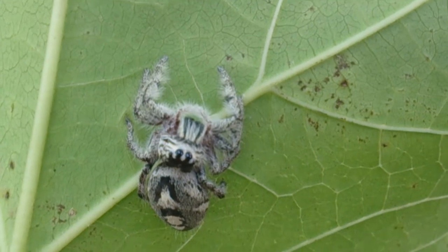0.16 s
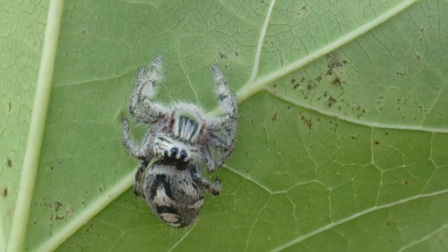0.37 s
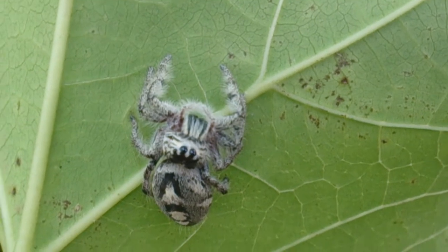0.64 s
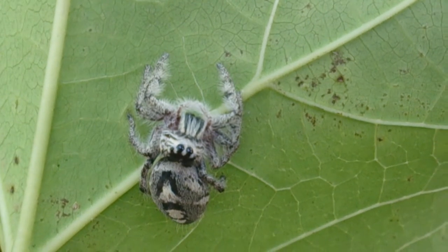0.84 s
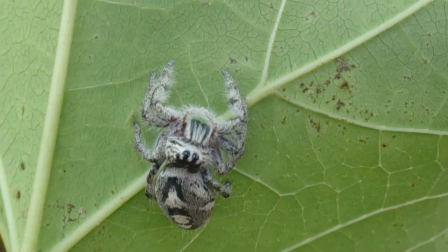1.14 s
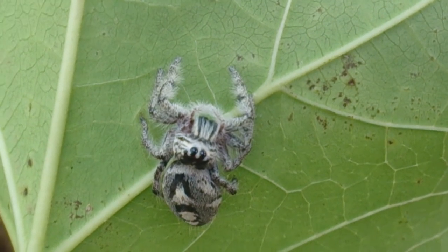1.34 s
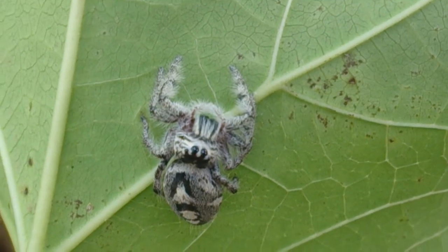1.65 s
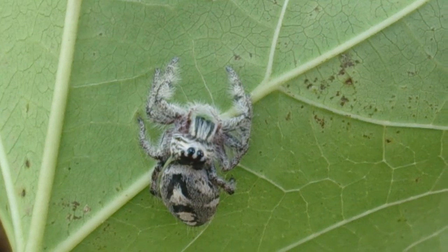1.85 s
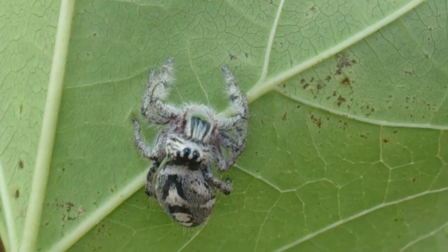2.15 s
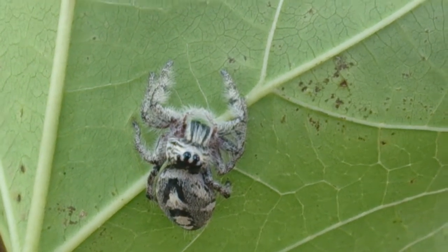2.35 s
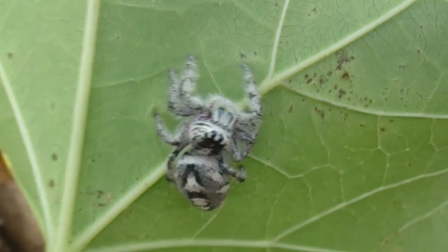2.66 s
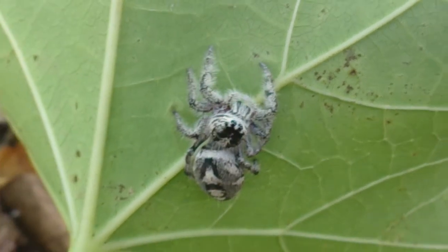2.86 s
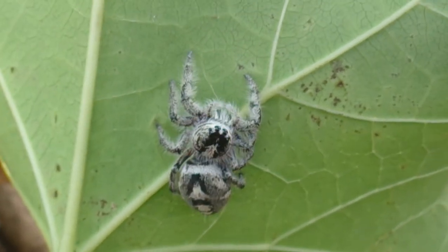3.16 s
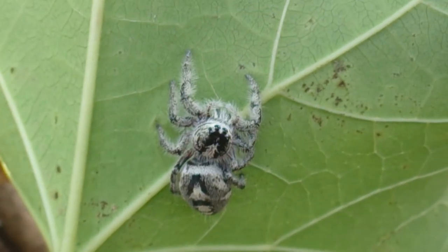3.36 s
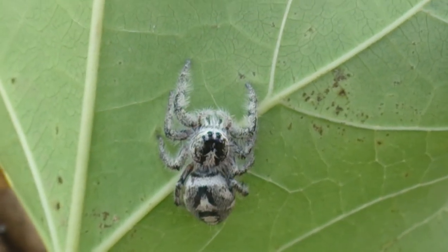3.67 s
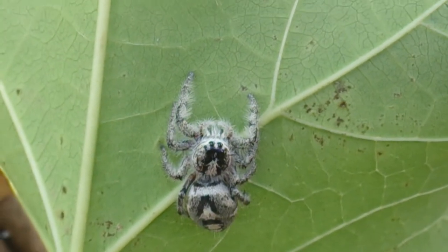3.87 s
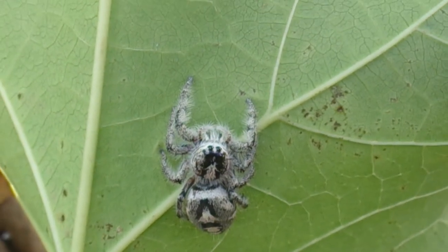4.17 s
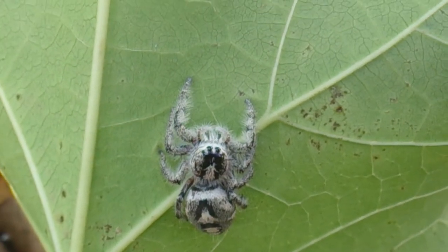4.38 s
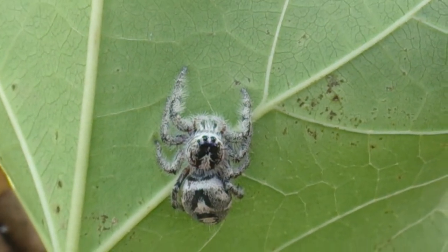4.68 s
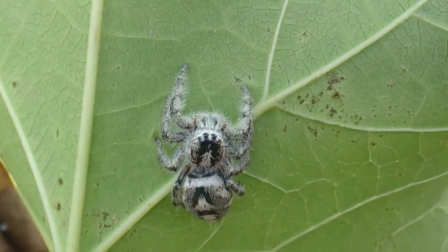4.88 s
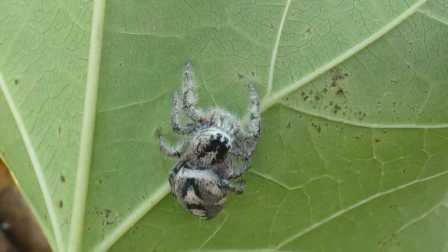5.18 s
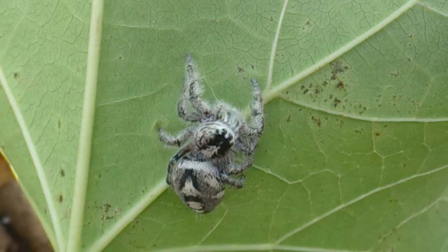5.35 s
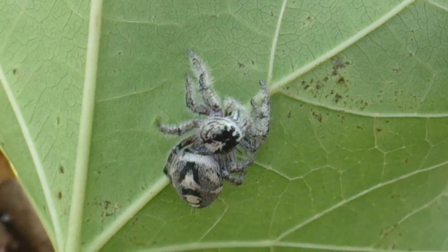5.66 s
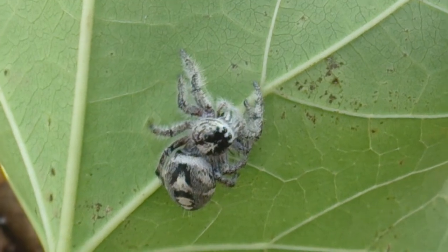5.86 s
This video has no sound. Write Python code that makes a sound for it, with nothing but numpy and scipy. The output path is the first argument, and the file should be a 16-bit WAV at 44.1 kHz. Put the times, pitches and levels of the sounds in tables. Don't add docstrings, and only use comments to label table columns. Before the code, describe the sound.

Breezy garden close-up: soft bassy gusts thump the microphone, a high cricket trills steadily, small ticks recur, and a near bird gives two short falling chirps.

```python
import sys
import numpy as np
from scipy import signal
from scipy.fft import rfft, irfft, next_fast_len
from scipy.io import wavfile
from scipy.ndimage import uniform_filter1d, map_coordinates

SR = 44100
rng = np.random.default_rng(int(sys.argv[2]) if len(sys.argv) > 2 else 0)


def gain_from_db(level_db):
    decades = np.asarray(level_db, float) / 20
    return 10 ** decades


def waveform_to_disk(signal):
    frames = np.transpose(np.atleast_2d(signal))
    scaled = np.clip(frames, -1, 1) * 32767
    samples = np.round(scaled).astype(np.int16)
    wavfile.write(sys.argv[1], SR, samples)


N = 265482


def unit(x):
    return x / np.sqrt(np.mean(x ** 2) + 1e-20)


def along(points, hz):
    f, v = np.transpose(points)
    return np.interp(np.log(hz + 1), np.log(f + 1), v)


def curve(rows):
    return np.interp(np.arange(N) / SR, *np.transpose(rows))


def wobble(rate):
    knots = rng.standard_normal(int(N * rate / SR) + 4)
    return map_coordinates(knots, [np.arange(N) * rate / SR])


def filtered(x, response):
    m = next_fast_len(N + SR // 2)
    return irfft(rfft(x, m) * response(np.fft.rfftfreq(m, 1 / SR)), m)[..., :N]


def resonances(peaks):
    def response(f):
        total = 0
        for k, (centre, width, db) in enumerate(peaks):
            damping = 1j * f * width
            total = total + (-1) ** k * gain_from_db(db) * damping / (centre * centre - f * f + damping)
        return total
    return response


def add(track, s, sound):
    part = track[round(s * SR):][:len(sound)]
    part += sound[:len(part)]


def notes(table, bend, skew, overtone_db, size, pointed=.46):
    out = np.zeros(N)
    for s, length, first_hz, last_hz, db, rough in table:
        u = np.arange(round(length * SR)) / (length * SR)
        phase = 2 * np.pi * np.cumsum(first_hz + (last_hz - first_hz) * u ** bend) / SR
        flutter = rng.standard_normal((2, SR // 4))
        flutter = uniform_filter1d(uniform_filter1d(flutter, size=size), size=size)
        flutter = unit(flutter)[:, :len(u)]
        unsteady = 1 - rough + rough * (flutter[0] + 1j * flutter[1]) / np.sqrt(2)
        voice = unsteady * np.exp(1j * phase)
        swell = np.sin(np.pi * u ** skew) ** pointed
        add(out, s, gain_from_db(db) * swell * (voice.real + gain_from_db(overtone_db) * (voice ** 2).real))
    return out


def foliage(x, t60, wet_db):
    t = np.arange(SR // 4) / SR
    tail = rng.standard_normal((2, len(t))) * gain_from_db(-60 * t / t60) * (t > .004)
    tail = tail / np.linalg.norm(tail[0])
    return gain_from_db(wet_db) * signal.fftconvolve(x[None], tail, axes=1)[:, :N]


def patchy(patchy_db):
    z = signal.stft(rng.standard_normal(N), nperseg=512)[2]
    field = uniform_filter1d(rng.standard_normal(z.shape), size=6, axis=0)
    field = uniform_filter1d(field, size=12, axis=1)
    return unit(signal.istft(z * gain_from_db(patchy_db * unit(field)), nperseg=512)[1][:N])


# (frequency [Hz], density [dB per Hz])
HISS_LEFT = [(100, -87), (200, -91.5), (400, -98), (800, -102.4), (1600, -104.8), (3000, -107.2),
             (6200, -110.8), (7000, -109.9), (7800, -107.7), (10600, -107.4), (11600, -103.2),
             (13000, -103.9), (15000, -106.8)]
HISS_RIGHT = [(200, -90.5), (400, -95.5), (800, -100.5), (1400, -100.4), (2300, -96), (3000, -98.5),
              (3700, -101.1), (5000, -101.1), (6200, -96), (7000, -96.5), (8300, -103.9), (11000, -106.6),
              (15000, -110.6)]
# (frequency [Hz], share [0-1])
COHERENCE = [(150, 0.32), (280, 0.58), (700, 0), (1500, 0), (2500, 0.2), (9000, 0.01)]


def hiss():
    frame_hz, port_lag = 29.97, 15
    share = lambda hz: np.clip(along(COHERENCE, hz), 0, 1)
    common = patchy(patchy_db=0.5)
    own = np.array([patchy(patchy_db=1.0), patchy(patchy_db=1.8)])
    shared = np.array([np.roll(common, port_lag), common])
    white = filtered(own, lambda hz: np.sqrt(1 - share(hz)))
    white = white + filtered(shared, lambda hz: np.sqrt(share(hz)))
    colour = lambda hz: gain_from_db([along([(40, -120)] + port, hz) for port in (HISS_LEFT, HISS_RIGHT)])
    left, right = np.sqrt(SR / 2) * filtered(white, colour)

    treble = filtered(left, lambda hz: hz ** 6 / (hz ** 6 + 8000. ** 6))
    turn = 2 * np.pi * frame_hz * np.arange(N) / SR
    throb_db = 1.67 * np.cos(turn + 1.1) + 1.62 * np.cos(2 * turn + 1.7)
    throb_db = throb_db + 0.65 * wobble(3.597) + 0.63 * wobble(60)
    return np.array([left + treble * (gain_from_db(throb_db + 1.0) - 1), right])


# (centre [s], pitch [Hz], peak [dB], side [0 left, 1 right])
SLAPS = [(2.199, 247, -40, 0), (2.209, 127, -34, 0), (2.474, 109, -35.5, 0), (2.592, 102, -36, 0),
         (3.469, 158, -41, 0), (2.741, 308, -51, 0), (4.958, 120.7, -43, 0), (1.68, 64, -30.5, 1),
         (1.934, 55.2, -21, 1), (2.478, 36.1, -21.5, 1), (2.935, 37.1, -21.5, 1), (3.498, 48.2, -21, 1),
         (5.071, 47.2, -21, 1), (5.251, 32.6, -22.5, 1), (5.476, 30.1, -21.5, 1), (0.157, 45.2, -32.5, 1),
         (1.954, 98.3, -41, 1), (5.076, 124.2, -45.5, 1), (2.533, 112.4, -36.5, 1), (2.841, 56.3, -27, 1),
         (3.086, 106.3, -32.5, 1), (3.283, 85.5, -33.5, 1), (5.201, 59, -32, 1), (5.406, 89.8, -33.5, 1),
         (1.57, 30, -45, 0), (1.781, 35, -41.5, 0), (2.11, 40, -44, 0), (2.33, 149, -44, 0),
         (3.552, 45, -36, 0), (5.52, 25, -42, 0)]
# (centre [s], pitch [Hz], peak [dB])
PATS_LEFT = [(0.314, 73, -52.5), (0.492, 87, -50.5), (0.892, 65, -50), (1.345, 86.3, -48.5),
             (1.487, 72.5, -49.5), (1.769, 73, -50), (1.833, 81, -47), (2.139, 66, -38.5),
             (2.871, 66, -52.5), (3.213, 70.3, -40.5), (3.562, 64, -45.5), (3.812, 61, -47),
             (4.335, 73, -47.5), (4.904, 64, -41), (5.371, 63, -45.5), (5.697, 75, -53)]
PATS_RIGHT = [(0.411, 78.5, -44), (0.467, 64, -40.5), (0.62, 49, -47), (0.729, 72, -49), (0.79, 56, -53.5),
              (0.892, 53, -46), (1.07, 64, -49.5), (1.182, 60, -44), (1.232, 64, -45), (1.461, 55.5, -40.5),
              (1.571, 54, -39), (1.859, 43.5, -34), (2.003, 53.7, -27.5), (2.083, 51.7, -26),
              (2.171, 52, -28), (2.36, 55, -39.5), (2.584, 63, -36), (2.636, 51.5, -28), (2.761, 45.4, -30),
              (3.158, 54.7, -33), (3.222, 62, -38.5), (3.384, 81.5, -39), (3.625, 51.7, -34),
              (3.685, 51.2, -34), (3.791, 53, -45), (3.882, 48, -42), (3.978, 47.8, -39.5),
              (4.06, 51, -48.5), (4.118, 45, -42), (4.2, 51, -54), (4.26, 55, -42), (4.338, 66, -55.5),
              (4.409, 60, -50.5), (4.527, 59, -44), (4.607, 76.4, -45), (4.893, 49, -44),
              (5.005, 53, -34.5), (5.556, 55, -35.5), (5.657, 47, -49.5), (5.714, 45, -37)]


def slaps():
    pat_db = -1
    edge_db, edge_ratio, edge_lead = -16, 1.9, .2
    out = np.zeros((2, N))
    t = np.arange(-SR // 10, SR // 10) / SR
    pats = [(s, hz, db + pat_db, side)
            for side, table in enumerate((PATS_LEFT, PATS_RIGHT)) for s, hz, db in table]
    for s, hz, db, side in SLAPS + pats:
        port = out[int(side > .5)]
        front = edge_ratio * (hz * t + edge_lead)
        add(port, s - .1, gain_from_db(db + edge_db) * np.exp(-(2 * front) ** 2) * np.sin(2 * np.pi * front))
        body = np.cos(2 * np.pi * hz * t * (1 - 0.191 * hz * t))
        add(port, s - .1, gain_from_db(db) * np.exp(-(1.897 * hz * t) ** 2) * body)
    return out


def stirred(calm_db, side):
    stir_db, stir_s = -18, .035
    time = np.arange(N) / SR
    wakes = sum(gain_from_db(db + stir_db) * np.exp(-((time - s) / stir_s) ** 2)
                for s, hz, db, port in SLAPS if int(port > .5) == side)
    return 20 * np.log10(gain_from_db(calm_db) + wakes)


def eddies(breeze_db, firm_db, grows, calm_db):
    reference_db = -40
    windy_db = firm_db + grows * (breeze_db - reference_db)
    return 10 * np.log10(gain_from_db(2 * windy_db) + gain_from_db(2 * calm_db))


def buffet(colour, gust_db, ripple_db, lumpy_db):
    white = rng.standard_normal(N)
    shape = lambda hz: gain_from_db(along(colour + [(600, -130)], hz)) * (hz > 3)
    air = filtered(white, shape)
    small = filtered(white, lambda hz: shape(hz) * hz ** 4 / (hz ** 4 + 60 ** 4))
    big = unit((air - small) * gain_from_db(lumpy_db * wobble(7.4)))
    bunching = .4 + uniform_filter1d(np.abs(big), size=900)
    small = unit(small * gain_from_db(2.5 * wobble(22)) * bunching)
    return gain_from_db(gust_db) * big + gain_from_db(ripple_db) * small


# (frequency [Hz], density [dB per Hz])
EDDY_LEFT = [(8, -63.5), (20, -58), (30, -60.5), (45, -63.5), (70, -67.5), (100, -77), (150, -78.5),
             (250, -94.5)]
EDDY_RIGHT = [(6, -44), (12, -48), (20, -51.5), (30, -45), (45, -56.5), (70, -59.5), (100, -66.5),
              (150, -73.5), (250, -101)]
# (time [s], strength [dB])
BREEZE = [(0, -61), (.15, -43), (.3, -65), (1.0, -60), (1.5, -62), (1.75, -43), (2.0, -36), (2.35, -41),
          (2.6, -37.5), (3.0, -43), (3.5, -37), (3.8, -52), (4.2, -44), (4.45, -63), (4.9, -45.5),
          (5.1, -40), (5.5, -46), (6.02, -50.5)]
# (time [s], strength [dB])
LEE = [(0, -37.5), (.4, -56), (1.4, -46.5), (2.0, -39.5), (2.5, -29), (2.95, -45), (3.5, -31.5),
       (3.75, -39.5), (4.6, -49), (4.95, -36.5), (6.02, -46.5)]


def wind():
    breeze_db, lee_db = curve(BREEZE), curve(LEE)
    big_left = eddies(lee_db, firm_db=-57.5, grows=0.99, calm_db=-69)
    small_left = eddies(lee_db, firm_db=-68, grows=1.17, calm_db=-65.5)
    big_right = eddies(breeze_db, firm_db=-34, grows=0.868, calm_db=-48)
    small_right = eddies(breeze_db, firm_db=-54, grows=2.35, calm_db=-57.5)
    left = buffet(EDDY_LEFT, big_left, stirred(small_left, 0), lumpy_db=-1.5)
    right = buffet(EDDY_RIGHT, big_right, stirred(small_right, 0.996), lumpy_db=2.0)
    return np.array([left, right]) + slaps()


def cricket():
    start_s, period_s, chirr_db = .034, .1186, -57.5
    lull_s, lull_wide_s, lull_db = 4.1, .3, 1.5
    attack_s = .0018
    out, t = np.zeros(N), np.arange(SR // 50) / SR
    effort = chirr_db - lull_db * np.exp(-((np.arange(N) / SR - lull_s) / lull_wide_s) ** 2)
    for s in np.arange(start_s, N / SR - .04, period_s):
        chance = rng.standard_normal(8) * [2, 2, 2, 2, 2, 2, .8, 1.5]
        for k in range(6):
            hz = 7660 - 60 * k + 40 * chance[k]
            stroke = np.sin(2 * np.pi * hz * t) * (t / attack_s) * np.exp(1 - t / attack_s)
            size_db = effort[round(s * SR)] + chance[6] + chance[5 - k] - 1.6 * abs(k - 1.3)
            when = s + .0062 * k + chance[7] / 1000 + .0005 * chance[k - 3]
            add(out, when, gain_from_db(size_db) * stroke)
    return out


# (start [s], length [s], first pitch [Hz], last pitch [Hz], peak [dB])
HIGH_WHISTLES = [
    (.2, .1, 6900, 7450, -59),
    (.41, .06, 6700, 7250, -58),
    (.655, .09, 6700, 7200, -58),
    (.93, .05, 6500, 7000, -58),
    (.96, .15, 6950, 7350, -56),
    (3.215, .13, 6650, 7150, -57),
    (4.85, .05, 6950, 7100, -58),
    (5.07, .14, 6100, 7350, -59),
    (5.29, .06, 6950, 7000, -58),
    (5.77, .11, 6500, 7150, -59),
]
# (start [s], length [s], first pitch [Hz], peak [dB])
LOW_WHISTLES = [
    (1.115, .1, 3800, -62.5),
    (1.65, .06, 4400, -69),
    (2.0, .1, 4100, -68),
    (3.665, .065, 4150, -62.5),
    (4.84, .07, 4100, -67),
    (5.955, .08, 3870, -57.5),
]


def far_birds():
    rise_hz_per_s, high_rough, low_rough = 9500, .55, .35
    high = [(s, length, first_hz, last_hz, db - 1, high_rough)
            for s, length, first_hz, last_hz, db in HIGH_WHISTLES]
    low = [(s, length, hz, hz + rise_hz_per_s * length, db, low_rough)
           for s, length, hz, db in LOW_WHISTLES]
    return (notes(high, bend=.75, skew=.6, overtone_db=-40, size=75)
            + notes(low, bend=1.05, skew=.75, overtone_db=-40, size=110))


# (centre [Hz], width [Hz], level [dB])
LEAF = [(990, 600, -13), (3074, 460, -6), (4000, 540, -3.5), (5990, 1170, -8), (6890, 380, -0.5),
        (10500, 2500, -16.5)]
# (start [s], length [s], level [dB], centre [Hz], width [Hz])
SNAPS = [(0.231, 0.027, -58, 2200, 900), (0.43, 0.018, -59.5, 2800, 500), (0.643, .012, -56, 1000, 200),
         (0.64, .012, -53.5, 4800, 4000), (.7, .012, -56, 3000, 500), (.717, .012, -54, 3500, 1500),
         (.709, .014, -54, 6000, 600), (1.371, .012, -60, 3200, 1500), (1.802, 0.013, -58, 5300, 1500),
         (2.97, 0.016, -57.5, 3180, 1200), (4.025, 0.0095, -56.5, 5800, 900),
         (4.306, .012, -59, 11000, 5000)]


def leaf():
    rustle_s, rustle_db, rise_s, fall_s = .722, -54, .035, .07
    grains = rng.standard_normal(N) * gain_from_db(3 * wobble(350))
    after = np.arange(N) / SR - rustle_s
    swell = gain_from_db(rustle_db) * np.exp(-np.where(after < 0, (after / rise_s) ** 2, after / fall_s))
    out = swell * unit(filtered(grains, resonances(LEAF)))
    for s, length, db, hz, width in SNAPS:
        puff = signal.lfilter(*signal.iirpeak(hz, hz / width, SR), rng.standard_normal(SR // 20))
        samples = round(length * SR)
        add(out, s, gain_from_db(db) * unit(puff)[:samples] * np.hanning(samples))
    return out


# (frequency [Hz], level [dB], time to fall 60 dB [s])
RATCHET = [(13760, 7.5, 0.0023), (5210, -4, 0.0056), (8860, 0.5, 0.0025), (2030, -3.5, 0.00275),
           (12000, -0.5, 0.00375), (14800, 1, .003)]
HUNTING = [
    5.1569,
    5.321,
    5.3924,
    5.6274,
]
# (start [s], end [s], level [dB])
WHIRRS = [
    (1.599, 1.92, -65),
    (3.768, 4.037, -64.5),
]
# (centre [Hz], width [Hz], level [dB])
HOUSING = [(7900, 500, -22), (9700, 550, -1.5), (11740, 260, 9), (13200, 900, -2)]


def lens():
    tick_start, tick_period, tick_count = .297, .47076, 11
    tick_db, hunting_db = -45.3, -46.5
    out, t = np.zeros(N), np.arange(SR // 50) / SR
    rise = 1 - np.exp(-t / .00012)
    steady = [(tick_start + k * tick_period, tick_db) for k in range(tick_count)]
    for s, db in steady + [(s, hunting_db) for s in HUNTING]:
        sizes = db + rng.normal(.5, 1.2, len(RATCHET))
        ring = sum(gain_from_db(size + level - 60 * t / t60) * np.sin(2 * np.pi * hz * t)
                   for (hz, level, t60), size in zip(RATCHET, sizes))
        add(out, s - .0002, ring * rise)

    time = np.arange(N) / SR
    running = sum(gain_from_db(db) * np.clip(np.minimum(time - start, end - time) / 0.0143, 0, 1)
                  for start, end, db in WHIRRS)
    throbs = gain_from_db(2.4 * wobble(70))
    motor = unit(filtered(rng.standard_normal(N), resonances(HOUSING)) * throbs)
    return out + running * motor


# (start [s], length [s], first pitch [Hz], peak [dB])
FALLS = [(3.027, .0095, 5550, -45), (3.056, 0.0105, 6700, -50.5), (3.069, 0.006, 5350, -45.5),
         (3.0905, .008, 7400, -50), (3.097, 0.0135, 5750, -32), (3.1085, .005, 4950, -40),
         (3.115, .006, 5100, -49), (3.1348, 0.003, 5300, -35), (3.2865, .015, 5550, -46.5),
         (3.318, .007, 5800, -46), (3.324, .004, 5600, -40), (3.3275, 0.007, 5350, -34.5),
         (3.3325, .006, 4950, -42), (3.3505, .006, 6200, -49), (3.359, 0.004, 5300, -39.5),
         (3.3635, .004, 5350, -39.5)]
# (start [s], length [s], pitch [Hz], peak [dB])
HOLDS = [
    (3.1275, 0.018, 5470, -43.5),
    (3.130, .013, 4950, -52),
    (3.131, .014, 7150, -57),
    (3.148, .016, 5500, -54),
    (3.323, 0.008, 6800, -50),
    (3.353, 0.011, 5350, -46),
    (3.356, .007, 5050, -48),
    (3.366, 0.02, 5480, -50),
    (3.396, .011, 5460, -54),
]


def near_bird():
    rest_hz, slack_s = 3950, .013
    clear, hoarse = .1, .35
    falls = [(s, length, hz, rest_hz + (hz - rest_hz) * np.exp(-length / slack_s), db, clear)
             for s, length, hz, db in FALLS]
    holds = [(s, length, hz, hz, db, hoarse) for s, length, hz, db in HOLDS]
    return (notes(falls, bend=.8, skew=1.1, overtone_db=-22, size=20, pointed=1.1)
            + notes(holds, bend=.9, skew=.9, overtone_db=-25, size=50))


# (frequency [Hz], gain [dB])
LEFT_PORT = [(1000, -3), (3500, -8), (4800, -27), (5450, -14), (6200, -24), (12000, -20)]


def scene():
    own = hiss()
    air = wind()
    chirr = cricket()
    far = far_birds()
    leaves = leaf()
    drive = lens() * [[1], [0]]
    near = near_bird()
    garden = near + far + chirr + leaves
    garden = garden + foliage(chirr, t60=0.09, wet_db=-6) + foliage(far, t60=0.056, wet_db=-9)
    garden = garden + foliage(near, t60=0.117, wet_db=-13.5)
    dim = filtered(np.roll(garden[0], 17), lambda hz: gain_from_db(along(LEFT_PORT, hz)))
    return np.array([dim, garden[1]]) + own + drive + air


def roll_off(x):
    return signal.sosfilt(signal.butter(12, 15650, fs=SR, output="sos"), x)


def record(dry):
    top_hz = 15650
    mix = filtered(dry, lambda hz: 1 / (1 + (hz / top_hz) ** 60))
    return roll_off(mix)


dry = scene()
out = record(dry)
waveform_to_disk(out)
```